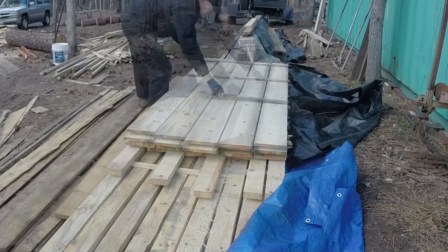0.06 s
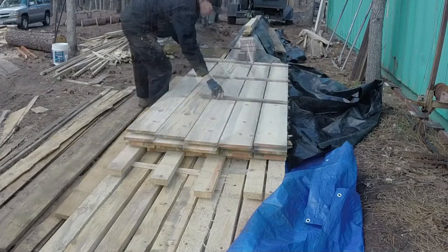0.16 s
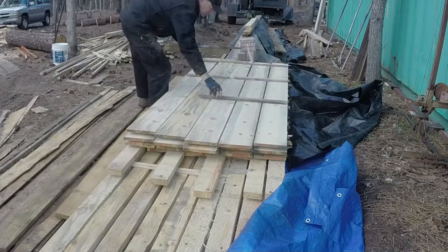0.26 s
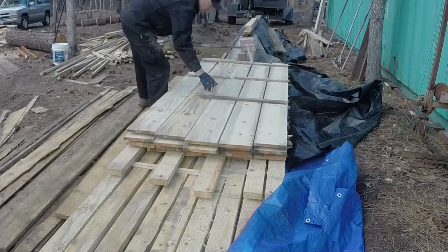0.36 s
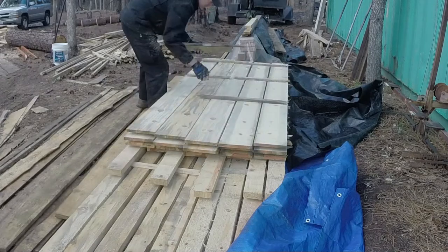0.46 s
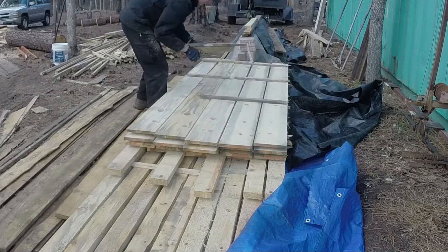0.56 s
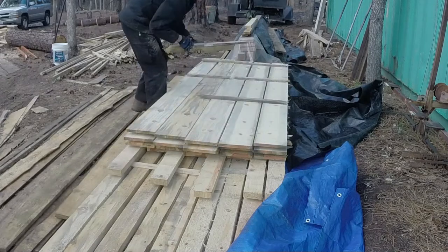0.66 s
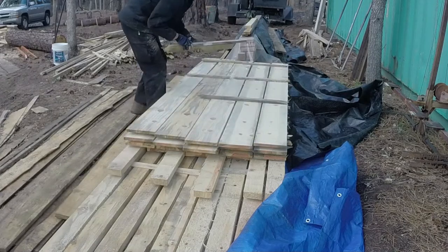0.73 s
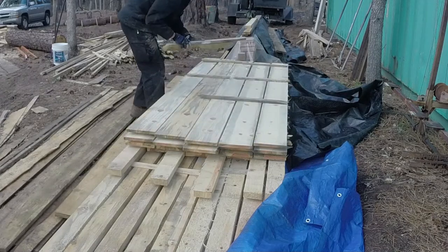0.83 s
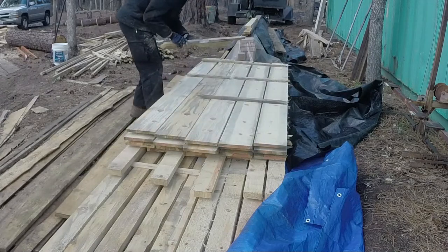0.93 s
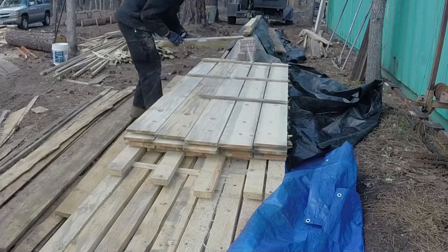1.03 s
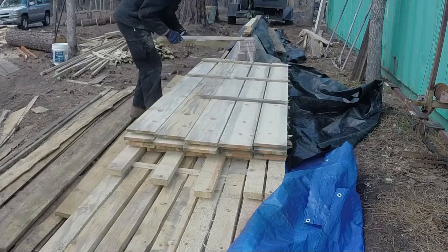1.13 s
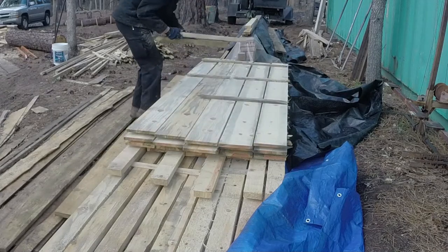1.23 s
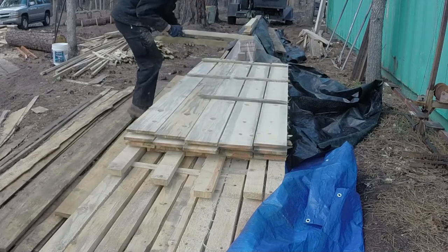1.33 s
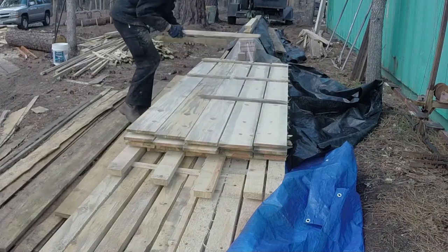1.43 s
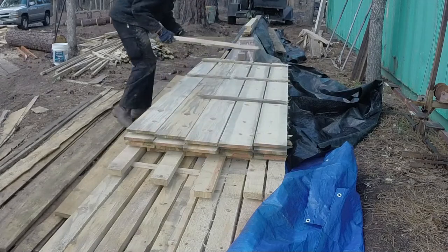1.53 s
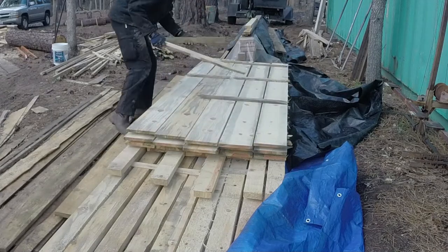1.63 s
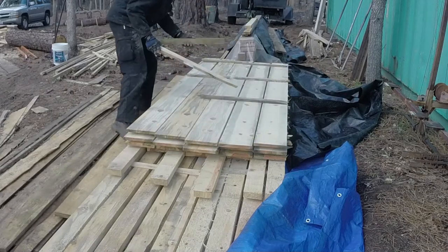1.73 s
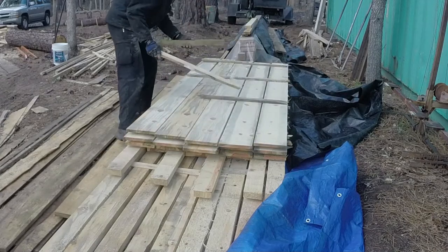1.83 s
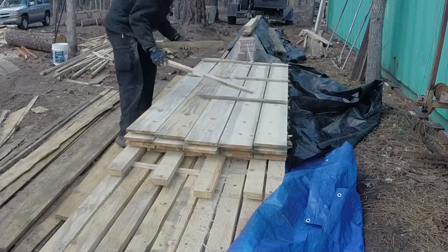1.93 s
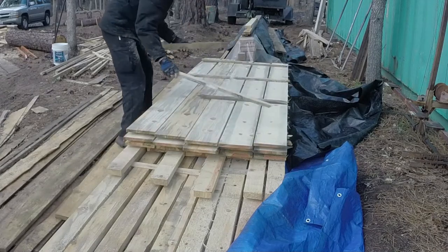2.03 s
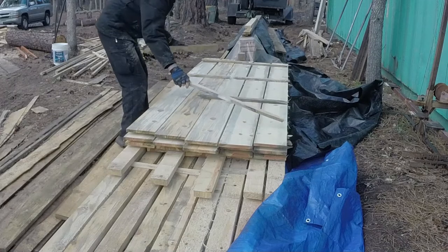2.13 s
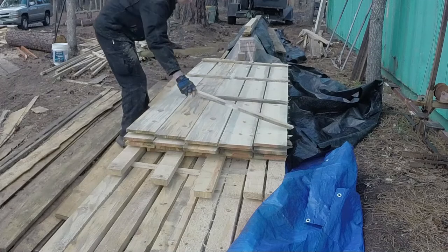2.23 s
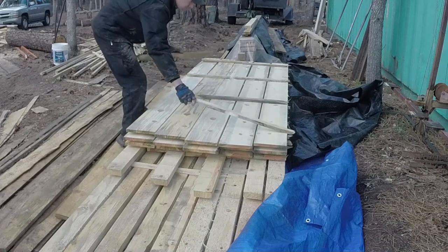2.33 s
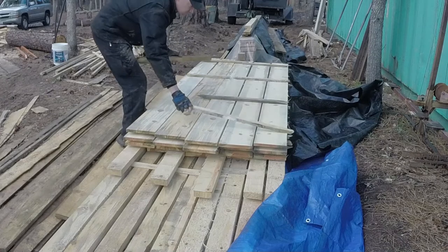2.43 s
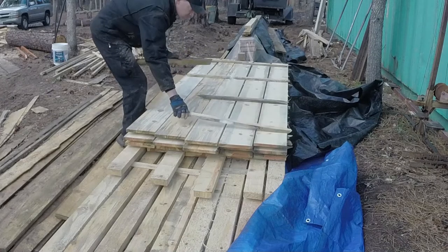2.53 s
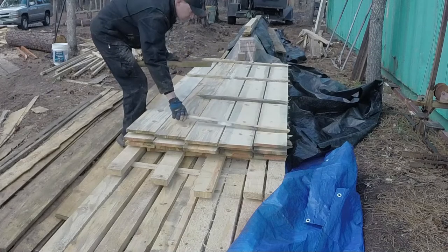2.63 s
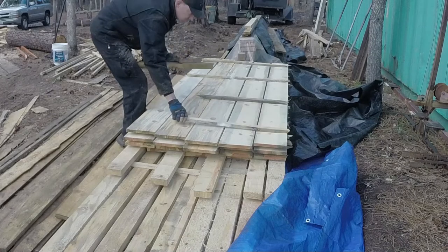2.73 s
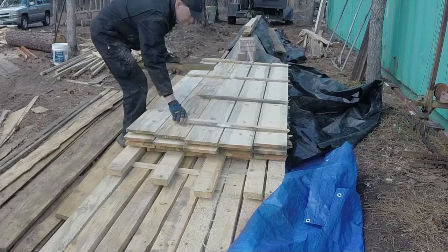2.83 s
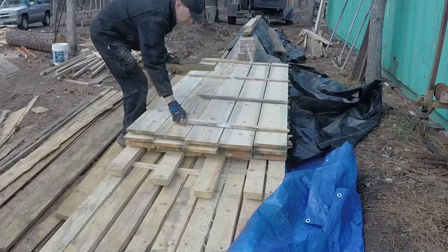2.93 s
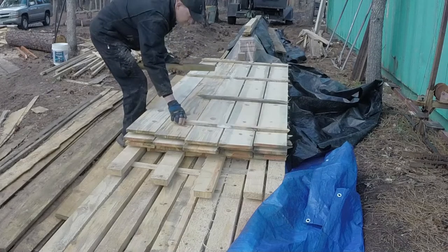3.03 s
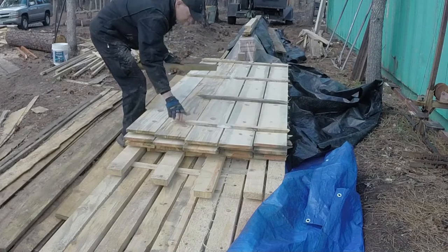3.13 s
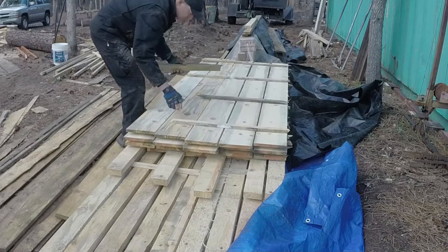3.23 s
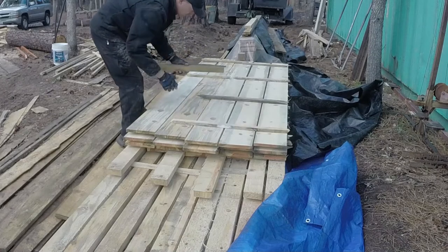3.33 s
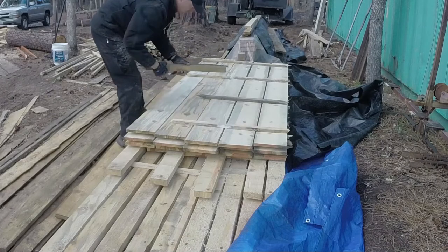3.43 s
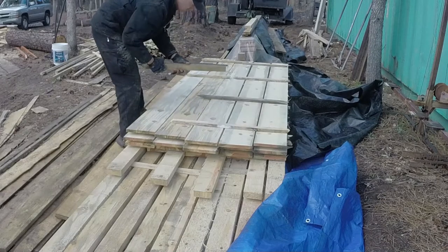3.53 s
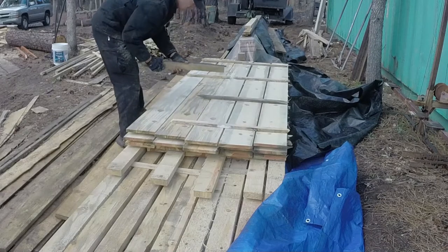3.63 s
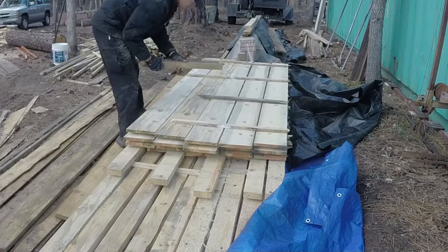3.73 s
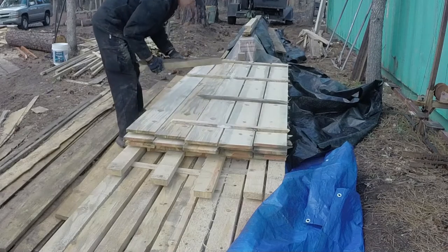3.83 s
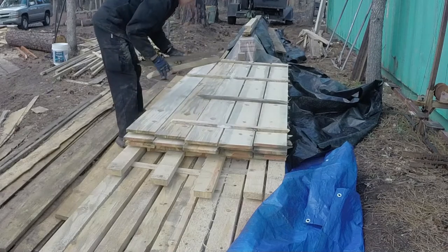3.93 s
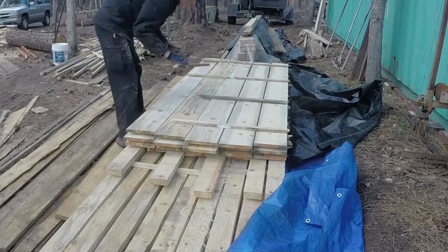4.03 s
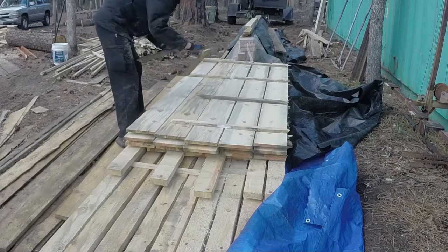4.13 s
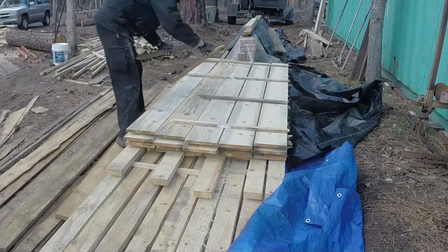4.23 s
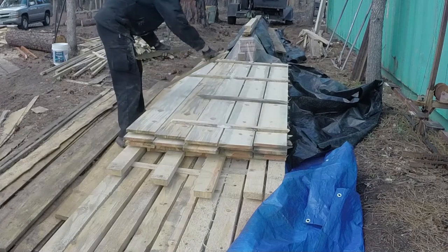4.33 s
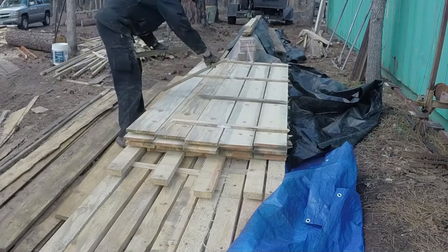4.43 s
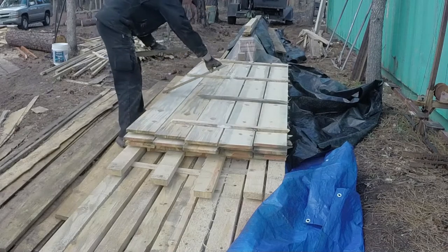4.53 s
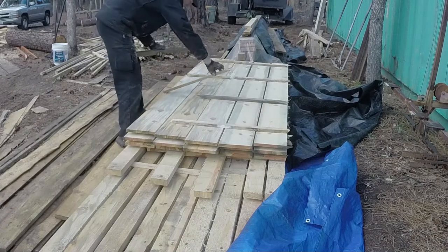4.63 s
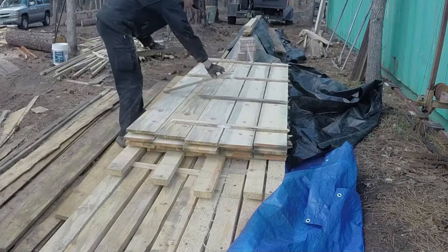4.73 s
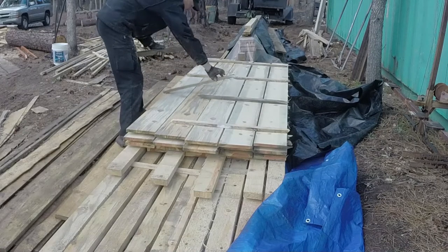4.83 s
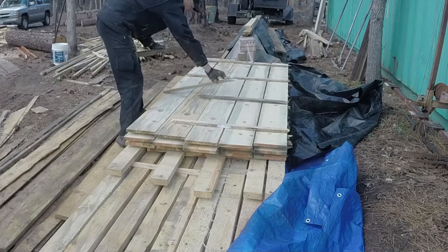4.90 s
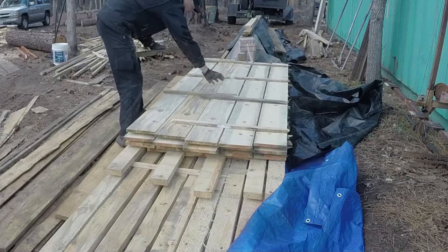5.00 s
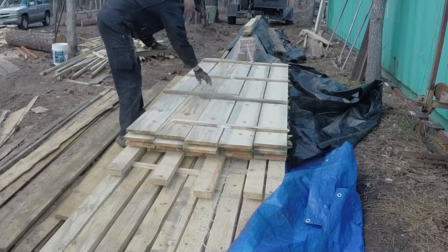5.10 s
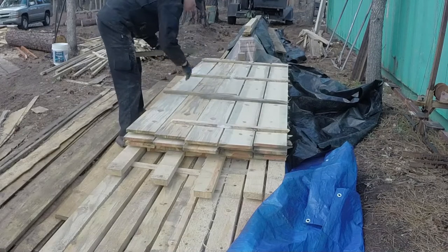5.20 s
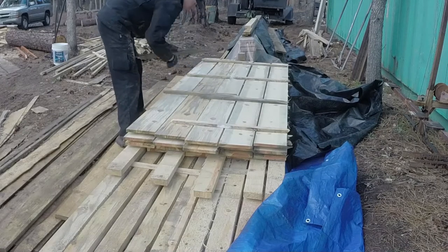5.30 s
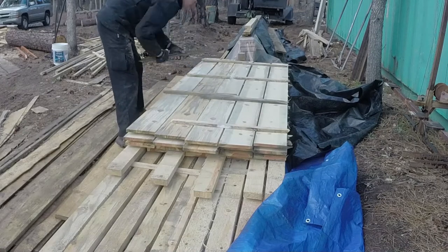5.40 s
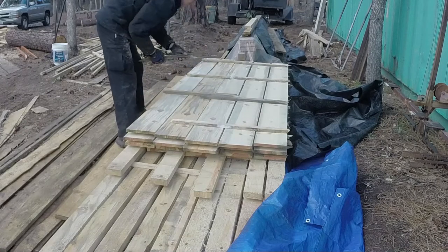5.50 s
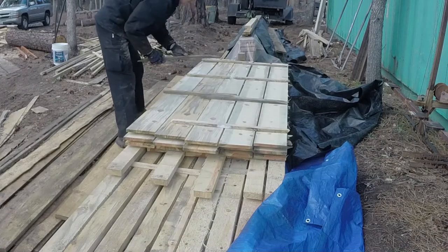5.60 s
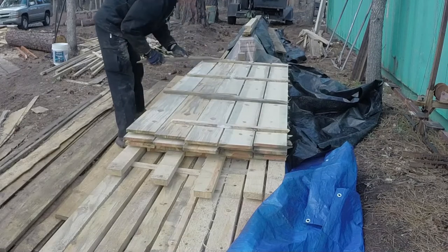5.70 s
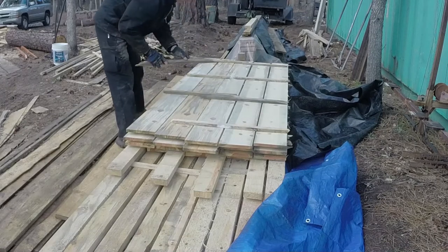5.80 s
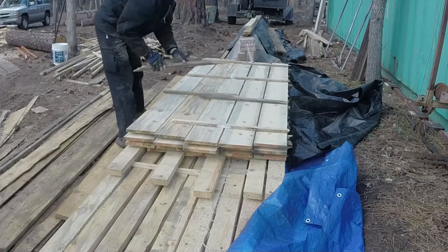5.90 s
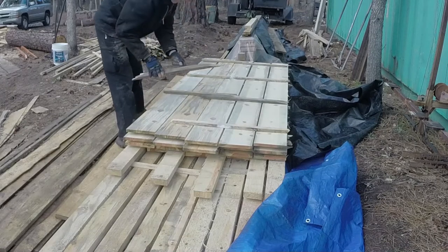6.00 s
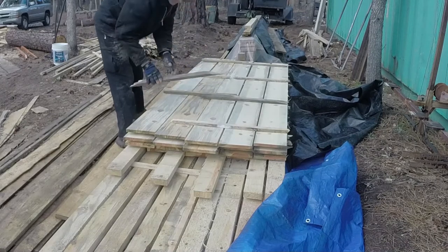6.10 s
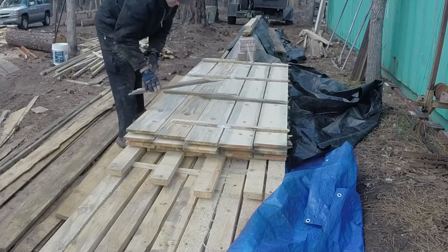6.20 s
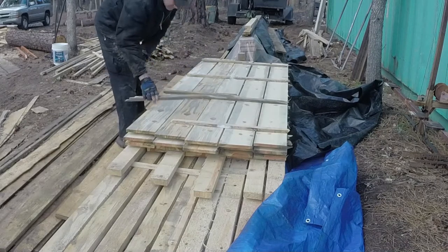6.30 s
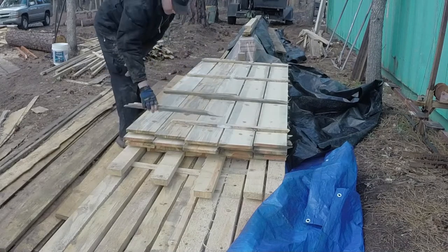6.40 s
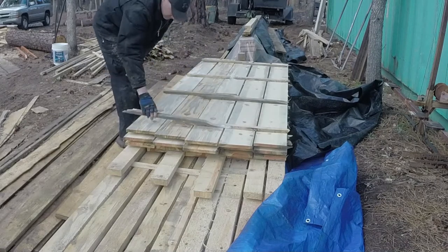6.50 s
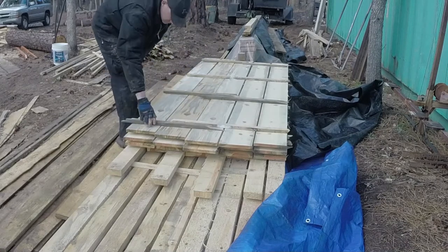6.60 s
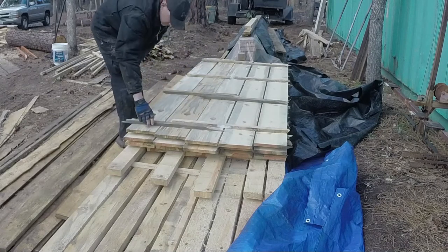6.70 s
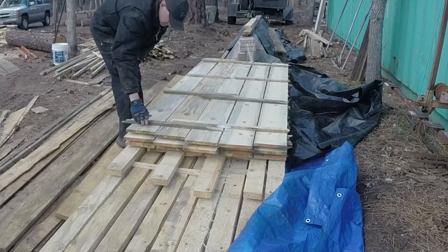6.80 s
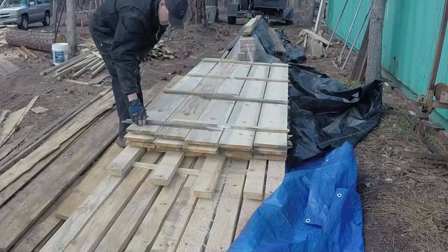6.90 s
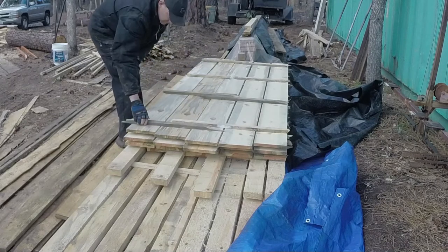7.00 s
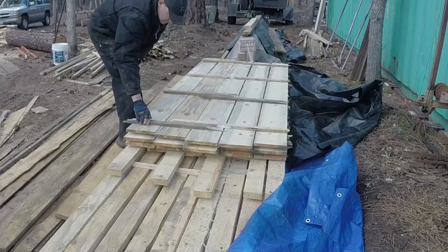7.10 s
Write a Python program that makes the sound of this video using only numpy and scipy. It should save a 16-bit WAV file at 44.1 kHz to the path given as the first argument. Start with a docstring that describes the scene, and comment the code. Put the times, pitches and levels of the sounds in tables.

```python
"""Thin wooden strips laid one by one across a stack of sawn boards, close to a stereo microphone
in an open yard. Each strip knocks, bounces and rings briefly in its bending modes; the last one
skids, its edges catching on the rough timber. Between the knocks a loose board rocks, boots thud
a little to the left, gloves rub and work clothes rustle. Small birds call far off on the right.
Under it all lie soft open air and a faint, narrow band of hiss that swells now and then."""
import sys
import numpy as np
from scipy import signal
from scipy.fft import rfft, irfft
from scipy.io import wavfile
from scipy.ndimage import uniform_filter1d

SR = 44100
rng = np.random.default_rng(int(sys.argv[2]) if len(sys.argv) > 2 else 0)


def pcm_store(signal):
    """Save signal as 16-bit PCM."""
    levels = np.round(np.clip(np.atleast_2d(signal), -1, 1) * 32767)
    wavfile.write(sys.argv[1], SR, levels.astype(np.int16).T)


N = 315315

# the open air and the narrow hiss, spectral density: frequency_hz, relative_db
AIR_COLOUR = [(12, -43.5), (20, -14.5), (60, 3.5), (81, -5.5), (187, -9), (277, -9.5), (328, -13.5),
              (367, -7), (607, -13), (1370, -30.5), (2020, -36.5), (2600, -40), (8890, -41.5),
              (11400, -43.5), (13500, -56.5), (16000, -69.5)]
HISS_COLOUR = [(1400, -24), (1850, -5.5), (2150, 2), (2420, -10.5), (2900, -13.5), (4000, -31.5)]
# how the open air leans between the microphones: frequency_hz, left_minus_right_db
AIR_BALANCE = [(110, 2), (300, -1), (2400, 0), (8000, 2)]
# how alike left and right are in background and near noise: frequency_hz, correlation
BACKGROUND_LIKENESS = [(60, 0.79), (300, 0.94), (640, 0.92), (1400, 0.94), (3100, 0.041), (8000, 0)]
NEAR_LIKENESS = [(60, 0.9), (1000, 1), (3000, 0.14), (10000, 0.26)]
# dulling of near sound at the left microphone: frequency_hz, gain_db
LEFT_SHADOW = [(300, -0.5), (1400, -1), (3500, -3), (9000, -5.5)]
# swells of the narrow hiss: peak_s, length_s, level_db
HISS_SWELLS = [(.21, 0.041, -72.5), (.57, 0.24, -70), (1.48, 0.62, -74.5), (2.7, 0.46, -75.5),
               (3.33, 0.46, -77), (4.45, 0.48, -91), (5.35, 0.48, -79.5), (6.2, 0.3, -74.5),
               (6.52, 0.24, -71), (6.85, 0.3, -81.5)]
# thin bird calls far off: start_s, length_s, top_pitch_hz, level_db
BIRD_CALLS = [(2.55, .06, 11500, -86), (2.73, 0.056, 11600, -89), (2.8, .07, 10300, -89),
              (6.485, .08, 9580, -83), (6.743, 0.12, 11300, -92), (6.939, 0.056, 10400, -90)]

# soles on soil, gloves on timber and moving cloth, spectral density: frequency_hz, relative_db
SCUFF_COLOUR = [(20, -24.5), (50, 1), (110, -3), (250, -5.5), (400, -17), (800, -21), (2000, -42.5)]
RUB_COLOUR = [(250, -12), (500, -4), (900, 0.5), (1500, -4), (2200, -6), (2900, -7.5), (4200, -10),
              (7000, -31.5)]
SWISH_COLOUR = [(2000, -12.5), (4200, -5), (6500, -2.5), (9000, -4.5), (11500, -10), (13000, -15.5),
                (16000, -20)]
# a boot shifts over soil and planks: peak_s, length_s, relative_db
BOOT_SCUFFS = [(.47, 0.12, -58), (.70, 0.46, -55.5), (1.52, 0.54, -61.5), (1.97, 0.058, -54.5),
               (2.19, 0.41, -54.5), (3.39, 0.3, -54.5), (4.20, 0.65, -58.5), (4.60, 0.12, -54),
               (5.36, 0.27, -53.5), (5.94, 0.21, -51), (6.15, 0.13, -53.5), (6.33, 0.25, -50),
               (6.58, 0.45, -56.5)]
# an arm or the body sweeps round: peak_s, length_s, rub_relative_db, swish_relative_db
BODY_SWEEPS = [(0.218, 0.024, -75, -75), (0.40, 0.27, -69, -78.5), (0.578, 0.22, -59, -68.5),
               (0.639, 0.076, -62.5, -66), (0.772, 0.2, -66, -74), (0.982, 0.087, -67, -74),
               (1.12, 0.09, -75, -76.5), (1.39, 0.65, -63.5, -69), (1.555, 0.051, -63, -63.5),
               (2.095, 0.37, -63.5, -74), (2.374, 0.14, -62.5, -75.5), (2.577, 0.37, -70, -76.5),
               (3.343, 0.25, -62, -70.5), (3.57, 0.34, -66, -76), (3.853, 0.09, -73, -67),
               (3.92, 0.16, -66, -82), (4.417, 0.86, -65.5, -76.5), (4.77, 0.37, -68.5, -72),
               (5.28, 0.9, -65.5, -71.5), (5.969, 0.18, -63, -72), (6.155, 0.12, -65.5, -71),
               (6.317, 0.22, -65.5, -78), (6.585, 0.56, -63.5, -72.5), (6.827, 0.14, -69, -76.5),
               (7.0, 0.25, -78, -85.5)]
# the worker is never quite still: scuff_relative_db, rub_relative_db, swish_relative_db
IDLE_LEVELS = (-74.5, -79.5, -91.5)
# boots land on soil and loose planks: start_s, level_db, pitch_hz, cycles_to_silence
BOOT_THUDS = [(0.559, -33, 150, 1.1), (0.652, -35.5, 132, 3.2), (0.71, -32.5, 72, 3.7),
              (0.894, -37.5, 328, 13), (1.437, -41, 67, 6.5), (2.149, -27, 85.4, 2.9),
              (2.156, -37, 228, 5.6), (2.169, -39, 188, 6.6), (3.327, -42, 106, 7),
              (3.593, -38.5, 130, 3.5), (4.249, -34, 129, 2.5), (4.436, -27, 139, 0.82),
              (5.484, -31, 132, 3.6), (6.23, -41.5, 108.4, 6.6), (6.307, -32, 94.5, 4.5),
              (6.422, -38, 138, 4.4), (6.801, -44.5, 123.6, 3.8)]

# wood sliding, dragging, snapping and cracking, spectral density: frequency_hz, relative_db
SLIDE_COLOUR = [(5000, -24), (6500, -4.5), (8000, -10), (10000, 0), (11200, 0.5), (12800, -6.5),
                (15500, -16.5)]
DRAG_COLOUR = [(130, -5), (260, 2.5), (450, -2.5), (700, -8.5), (1000, -8.5), (1500, -22.5), (3000, -31.5),
               (6000, -45)]
SNAP_COLOUR = [(800, -11), (2500, 5), (4000, -2.5), (5200, 1.5), (7500, -3.5), (10500, -8), (13000, -5),
               (16000, -16)]
CRACK_COLOUR = [(600, -15.5), (1300, -4.5), (1750, -1.5), (2200, 6), (3200, 6), (4300, 0.5), (6000, -23.5),
                (12000, -28.5)]
# a strip slides through the gloves: start_s, length_s, level_db
GLOVE_SLIDES = [(1.153, 0.48, -67), (1.45, 0.43, -75), (4.578, 0.3, -72.5), (4.99, 0.35, -68.5)]
# wood catches on wood and squeaks: start_s, pitch_hz, level_db
WOOD_SQUEAKS = [(3.083, 5750, -52), (3.347, 8400, -54.5), (3.547, 5600, -54.5), (3.797, 6500, -61),
                (3.812, 8200, -58), (4.996, 5920, -53)]
# a strip is pushed into place: peak_s, length_s, level_db
STRIP_DRAGS = [(1.955, .022, -59), (2.40, .11, -51)]
# splinters and twigs snap, rough edges catch: start_s, level_db, t60_s, pan_db, low_hz, high_hz
SPLINTER_SNAPS = [(0.725, -62, .012, -3, 7000, 13000), (0.932, -58, 0.012, 0, 5000, 13000),
                  (0.939, -64, .012, -5, 5000, 10000), (2.0384, -57, 0.012, 2, 4500, 9000),
                  (2.102, -52.5, 0.009, -6, 7040, 13000), (2.102, -44, 0.009, -9, 2400, 3800),
                  (2.1812, -52, 0.014, 7, 3000, 5500), (2.1874, -51, 0.009, 6, 3000, 7000),
                  (2.401, -60, 0.014, -4, 6000, 11000), (3.085, -55, 0.06, -1, 2010, 14500),
                  (3.3516, -47, 0.0091, 2, 6000, 11900), (3.544, -61, 0.084, -10, 4000, 14500),
                  (3.588, -54, 0.02, 10, 2020, 14500), (3.813, -58.5, .025, -4, 6500, 14500),
                  (3.892, -57.5, .025, -2, 3500, 14500), (4.299, -65, .008, -1, 5000, 8000),
                  (4.45, -64, .008, -2, 7000, 11000), (4.481, -56, .009, 0, 6000, 14000),
                  (4.818, -52, .008, 5, 4000, 12000), (4.88, -61, .008, 0, 4000, 12000),
                  (4.919, -53.5, 0.0094, 9, 4000, 12000), (5.079, -40, 0.013, -5, 1510, 14500),
                  (5.418, -52, 0.011, 3, 3500, 9000), (5.470, -56.5, 0.027, 3, 2000, 14500),
                  (5.489, -59, .008, 2, 7000, 14000), (5.603, -58, .04, -2.5, 2000, 14500),
                  (6.611, -52.5, 0.081, -2, 1490, 14400), (6.6652, -41, 0.054, -3.5, 3500, 14500),
                  (6.672, -34, 0.033, -2, 4300, 14000), (6.6762, -35, 0.028, -8, 4300, 14000),
                  (6.6878, -37, .035, 7, 4000, 14000), (6.6919, -32.5, 0.023, -1, 4000, 14000),
                  (6.703, -50, 0.063, -7, 5000, 14000), (6.746, -54, 0.028, -3, 4000, 11000)]
# a strip lands flat on the boards: start_s, level_db, centre_hz, t60_s, pan_db
STRIP_SLAPS = [(.247, -35.5, 1054, .045, 0), (2.0164, -26, 3500, 0.0095, -10),
               (2.0170, -25, 1400, .018, -3), (5.077, -29, 2300, .06, -3), (2.030, -41, 1250, .07, 2),
               (2.045, -35, 840, 0.072, 5), (4.554, -43.5, 690, .05, 1), (4.556, -54.5, 1510, 0.04, -1),
               (5.0758, -27, 2770, 0.045, -5), (5.081, -16, 1620, .046, -2.5), (5.090, -19, 633, .08, -0.5),
               (5.128, -39.5, 1200, .065, -1.5), (6.6641, -19, 1150, .016, -1), (6.666, -32, 1260, .06, -2),
               (6.673, -39, 2000, .07, -6), (6.686, -35, 2470, .05, 0), (6.698, -35.5, 1370, .06, -2)]

# how long the shaken stack rattles: frequency_hz, t60_s
STACK_RATTLE = [(100, 0.35), (300, 0.17), (700, 0.11), (1500, 0.1), (3000, 0.11), (8000, 0.063)]
# modes of the stack's low boom: pitch_hz, relative_db, t60_s
STACK_MODES = [(103.7, -26.5, 0.066), (153, -13, 0.05), (238, -10.5, 0.047)]
# bending modes of the four strips and of a loose top board: pitch_hz, relative_db, t60_s
STRIP_A_MODES = [(91, -9, 0.16), (144, -8.5, 0.14), (183, -17, 0.11), (282, 0.5, 0.062), (319.4, -20, 0.29),
                 (378, -17, 0.15), (456, 2.5, 0.044), (496, -10.5, 0.11), (536, -22, 0.19),
                 (591, -9.5, 0.051), (574, -11, 0.13), (660, 0.3, 0.037), (850, -22, 0.16),
                 (1108, -29, 0.11), (1323, -29, 0.045), (1510, -33, 0.045)]
STRIP_B_MODES = [(102, -28, 0.108), (192, -28, 0.2), (247, -11, 0.11), (291.5, -11.5, 0.148),
                 (286.3, 0.5, 0.11), (347, 2, 0.065), (415, -0.2, 0.069), (455, -1.5, 0.052),
                 (536, -19, 0.12), (654, -5.5, 0.077), (740, -24, 0.15), (840, -11, 0.052),
                 (933, -13, 0.046), (1176, -29, 0.2), (1270, -21, 0.071), (1460, -27, 0.056),
                 (2000, -22.5, 0.048)]
STRIP_C_MODES = [(102, -12, 0.2), (195, -15, 0.09), (240, -7, 0.15), (268, -12, 0.08), (298, -0.5, 0.09),
                 (360, -12, 0.17), (413, -14, 0.13), (460, -5.5, 0.12), (493, -2, 0.039), (588, -3, 0.09),
                 (628, -9, 0.09), (718, -4, 0.09), (883, -25, 0.15), (1010, -9, 0.045), (1130, -13, 0.055),
                 (1350, -5, 0.042), (1490, -6.5, 0.04), (1590, -15, 0.04), (1720, -14, 0.032),
                 (2030, -19, 0.036), (2300, -20, 0.032), (2680, -22, 0.028), (3150, -27, 0.025)]
STRIP_D_MODES = [(100, -14, 0.165), (131, -8.5, 0.13), (240, -26.5, 0.09), (299, -15.5, 0.13),
                 (384, -1, 0.09), (374, -3.5, 0.087), (541.6, -5, 0.11), (658, 0, 0.09), (727, -2.5, 0.074),
                 (786, -7, 0.07), (847, -5, 0.073), (1037, 1.5, 0.037), (1124, -13, 0.098),
                 (1308, -1.5, 0.04), (1400, -8, 0.09), (1640, -12, 0.061), (1754, -18, 0.07),
                 (2050, -24, 0.07)]
BOARD_MODES = [(134, 3, 0.082), (145, -16, 0.062), (201, -17, 0.18), (275, -15, 0.092), (311, -8, 0.099),
               (421, -7.5, 0.12), (593, -8, 0.076), (665, -10.5, 0.12), (730, -15.5, 0.15),
               (840, -7, 0.058), (1060, -16.5, 0.147)]
# the pieces of wood in the order they are handled
PIECES = [STRIP_A_MODES, STRIP_B_MODES, BOARD_MODES, STRIP_C_MODES, STRIP_D_MODES]
# when the hand takes each piece: start_s
PIECE_START_S = [0, 1, 3, 4, 5.8]
# where each piece lands: left_minus_right_db
PIECE_PAN_DB = [0.5, 1, -0.5, -1, -2]
# wood strikes wood: start_s, ring_db, thump_db, hardness_hz, bass_cut_hz
WOOD_KNOCKS = [(0.2442, -6.5, -24, 1600, 80.4), (0.25, -18.5, -40, 1290, 85),
               (0.265, -8.5, -38.3, 990, 730), (0.785, -45, -41.5, 1810, 300), (1.945, -48, -51, 1900, 500),
               (2.0171, -3.5, -12, 2500, 99), (2.021, -29, -10.5, 717, 102),
               (2.0308, -20, -18.5, 1783, 832), (2.045, -10.5, -13.5, 1201, 512),
               (2.081, -30, -21.5, 253, 115), (2.402, -39, -45, 1500, 450), (3.0814, -24, -40, 646, 178),
               (3.0847, -23, -31, 889, 98), (3.121, -27, -34.5, 900, 170), (4.553, -21.5, -28.5, 557, 85),
               (5.076, -5.5, -2, 4550, 108), (5.0814, 5.5, 9.5, 1950, 1640), (5.0898, 4.5, -3.5, 870, 810),
               (5.1274, -25, -26, 1865, 120), (6.6642, -9, -14, 2100, 337), (6.6754, -3.5, -38.5, 930, 580),
               (6.685, -16, -20, 2020, 111), (6.6987, -19.5, -31, 1500, 150), (6.742, -23.5, -24, 930, 160),
               (7.096, -58.5, -47, 1776, 700)]


def amp(db):
    """Decibels to amplitude."""
    return 10 ** (np.asarray(db) / 20)


def unit_rms(x):
    """Scales to rms 1."""
    return x / np.sqrt(np.mean(x ** 2) + 1e-20)


def decay(t, t60_s):
    """An envelope that falls 60 dB in t60_s."""
    return np.exp(-np.log(1000) * t / t60_s)


def curve_at(points, hz):
    """Reads a table on a log-frequency axis."""
    points_hz, values = np.transpose(points)
    return np.interp(np.log(hz + 1), np.log(points_hz + 1), values)


def coloured(x, colour):
    """Shapes the spectrum of a sound by a colour table."""
    hz = np.fft.rfftfreq(x.shape[-1], 1 / SR)
    return irfft(rfft(x) * amp(curve_at(colour, hz)), x.shape[-1])


def panned(x, pan_db):
    """Shares a sound between the microphones; positive is left."""
    return x * amp([[pan_db / 2], [-pan_db / 2]])


def add(mix, start_s, sound):
    """Mixes a sound in at start_s."""
    part = mix[:, round(start_s * SR):][:, :sound.shape[-1]]
    part += sound[..., :part.shape[1]]


def filtered(x, hz, kind, order):
    """Causal low-pass or high-pass."""
    return signal.sosfilt(signal.butter(order, hz, kind, fs=SR, output="sos"), x)


def noise(colour, likeness, patchy_db, balance=((1, 0), (2, 0))):
    """Stereo noise of rms 1 with a given colour and drifting patches."""
    frames, hz = N // 256 + 5, np.fft.rfftfreq(1024, 1 / SR)
    real, imag, own_real, own_imag, patches = rng.standard_normal((5, frames, len(hz)))
    patches = uniform_filter1d(patches, size=8, axis=0)
    patches = unit_rms(uniform_filter1d(patches, size=16, axis=1))
    shared = np.clip(curve_at(likeness, hz), -1, 1)
    right = real + 1j * imag
    left = shared * right + np.sqrt(1 - shared ** 2) * (own_real + 1j * own_imag)
    left *= amp(curve_at(balance, hz))
    spectra = np.array([left, right]) * amp(curve_at(colour, hz) + patchy_db * patches)
    return unit_rms(signal.istft(spectra.swapaxes(1, 2), nperseg=1024, noverlap=768)[1][:, :N])


def swells(events, rise_share, rise_shape, idle_db, fall_shape=2.9):
    """Each event gathers and eases off above a resting level; a higher shape is squarer."""
    t = np.arange(0, N, 64) / SR
    power = amp(idle_db) ** 2
    for peak_s, length_s, level_db in events:
        from_peak = np.maximum((peak_s - t) / rise_share, (t - peak_s) / (1 - rise_share)) / length_s
        shape = np.where(t < peak_s, rise_shape, fall_shape)
        power = power + (amp(level_db) * np.exp(-from_peak ** shape)) ** 2
    return np.interp(np.arange(N) / SR, t, np.sqrt(power))


def reflections(x, t60_by_hz, delay_s):
    """Dense random reflections, each band dying at its own speed; the sides part in the treble."""
    mid, side = rng.standard_normal((2, SR // 2))
    side = .5 * filtered(side, 4400, "high", order=1)
    hz, t, spectra = signal.stft(np.array([mid + side, mid - side]), SR, nperseg=256)
    spectra = spectra * decay(t, curve_at(t60_by_hz, hz)[:, None])
    tail = signal.istft(spectra, SR, nperseg=256)[1]
    tail = np.pad(tail, ((0, 0), (round(delay_s * SR), 0)))
    return signal.fftconvolve(x, tail / np.linalg.norm(tail[0]), axes=1)[:, :N]


def open_air(level_db=-60.5):
    """Soft, low noise from all round the yard."""
    return amp(level_db) * noise(AIR_COLOUR, BACKGROUND_LIKENESS, patchy_db=2, balance=AIR_BALANCE)


def narrow_hiss():
    """A faint, narrow band of hiss near 2.1 kHz that swells now and then."""
    strength = swells(HISS_SWELLS, rise_share=.55, rise_shape=3.8, idle_db=-90.5)
    return strength * noise(HISS_COLOUR, BACKGROUND_LIKENESS, patchy_db=1)


def distant_birds(arch_depth=.05, blur_db=-2):
    """Far to the right, whistles rise and fall a little, blurred by the trees."""
    out = np.zeros((2, N))
    for start_s, length_s, top_hz, level_db in BIRD_CALLS:
        bend = np.linspace(-1, 1, round(length_s * SR)) ** 2
        pitch_hz = top_hz * (1 - arch_depth * bend)
        whistle = np.sin(2 * np.pi * np.cumsum(pitch_hz) / SR)
        add(out, start_s, amp(level_db) * panned(whistle * (1 - bend), pan_db=-23))
    return out + amp(blur_db) * reflections(out, [(5000, .083), (15000, .12)], delay_s=.006)


def yard_echo(impacts, level_db=-32, t60_s=.49, bass_cut_hz=750):
    """The fence and trees return a faint, thin echo."""
    thin = filtered(impacts, bass_cut_hz, "high", order=2)
    return amp(level_db) * reflections(thin, [(2000, t60_s), (10000, t60_s / 2)], delay_s=.036)


def worker_rustle(scuff_db=-2, rub_db=-2, swish_db=1, crinkle_db=1.05, flips_per_s=25, flip_gain=2.2):
    """Close by, soles scuff, gloves rub on timber and cloth swishes with a fine crinkle."""
    scuff_idle_db, rub_idle_db, swish_idle_db = IDLE_LEVELS
    sweeps = np.array(BODY_SWEEPS)
    scuff = swells(BOOT_SCUFFS, rise_share=.43, rise_shape=5.2, idle_db=scuff_idle_db)
    rub = swells(sweeps[:, [0, 1, 2]], rise_share=.5, rise_shape=1.4, idle_db=rub_idle_db)
    swish = swells(sweeps[:, [0, 1, 3]], rise_share=.5, rise_shape=1.4, idle_db=swish_idle_db)
    flutter = unit_rms(uniform_filter1d(rng.standard_normal(N), size=90))
    crinkle = unit_rms(amp(crinkle_db * flutter))
    # folds of cloth flip over at random, each with a tiny 1 ms tick
    flips = (rng.random(N) < flips_per_s / SR) * rng.uniform(0, 1.6, N)
    flips = signal.lfilter([1], [1, -np.exp(-1 / (.001 * SR))], flips)
    swish *= 1 + flip_gain * flips
    soles = amp(scuff_db) * scuff * noise(SCUFF_COLOUR, NEAR_LIKENESS, patchy_db=3)
    gloves = amp(rub_db) * rub * crinkle * noise(RUB_COLOUR, NEAR_LIKENESS, patchy_db=3)
    cloth = amp(swish_db) * swish * crinkle * noise(SWISH_COLOUR, NEAR_LIKENESS, patchy_db=1.6)
    return panned(soles, pan_db=5) + gloves + cloth


def boot_thuds(softness_hz=600):
    """Left of centre, each boot gives a low push that dies within a few cycles."""
    out, t = np.zeros((2, N)), np.arange(SR // 4) / SR
    for start_s, level_db, pitch_hz, cycles in BOOT_THUDS:
        push = np.sin(2 * np.pi * pitch_hz * t) * decay(t, cycles / pitch_hz)
        add(out, start_s, amp(level_db) * filtered(push, softness_hz, "low", order=2))
    return panned(out, pan_db=5)


def strip_handling(squeak_s=.0091, squeak_jitter=.088):
    """Strips hiss through the gloves and, catching on wood, squeak at a wavering pitch."""
    sliding = np.zeros((1, N))
    for start_s, length_s, level_db in GLOVE_SLIDES:
        add(sliding, start_s, amp(level_db) * np.hanning(round(length_s * SR)))
    out = sliding * noise(SLIDE_COLOUR, NEAR_LIKENESS, patchy_db=-1.5)
    envelope = np.hanning(round(squeak_s * SR))
    for start_s, pitch_hz, level_db in WOOD_SQUEAKS:
        waver = unit_rms(uniform_filter1d(rng.standard_normal(SR // 10), size=20))[:len(envelope)]
        squeak = np.sin(2 * np.pi * np.cumsum(pitch_hz * (1 + squeak_jitter * waver)) / SR)
        add(out, start_s, amp(level_db) * envelope * squeak)
    return out


def strip_drags():
    """A strip pushed over the boards gives a soft, dull scrape."""
    strength = swells(STRIP_DRAGS, rise_share=.54, rise_shape=3.1, idle_db=-110)
    return strength * noise(DRAG_COLOUR, NEAR_LIKENESS, patchy_db=4.5)


def splinter_snaps(grain_db=4, grain_share=.29, stereo_width=.15):
    """Each snap is a quick, dying cluster of tiny fibre breaks."""
    out, t = np.zeros((2, N)), np.arange(SR // 5) / SR
    for start_s, level_db, t60_s, pan_db, low_hz, high_hz in SPLINTER_SNAPS:
        breaks = rng.standard_normal((2, len(t))) * (rng.random((2, len(t))) < grain_share)
        breaks *= amp(grain_db * np.minimum(rng.exponential(1, breaks.shape), 3))
        breaks = filtered(coloured(breaks, SNAP_COLOUR), high_hz, "low", order=3)
        mid, side = unit_rms(filtered(breaks, low_hz, "high", order=3))
        snap = np.array([mid + stereo_width * side, mid - stereo_width * side]) * decay(t, t60_s)
        add(out, start_s, amp(level_db) * panned(snap, pan_db))
    return out


def strip_slaps(width_octaves=.21):
    """Landing flat, a strip touches at many points at once: a dense burst around one pitch."""
    out, t = np.zeros((2, N)), np.arange(SR // 4) / SR
    octaves = np.log2(np.fft.rfftfreq(len(t), 1 / SR) + 1)
    for start_s, level_db, centre_hz, t60_s, pan_db in STRIP_SLAPS:
        band = np.exp(-.5 * ((octaves - np.log2(centre_hz)) / width_octaves) ** 2)
        burst = unit_rms(irfft(rfft(rng.standard_normal(len(t))) * band, len(t)))
        attack = 1 - np.exp(-(t * centre_hz) ** 2)
        add(out, start_s, amp(level_db) * panned(burst * attack * decay(t, t60_s), pan_db))
    return out


def mode_swings(modes, t):
    """Each mode of struck wood swings as a dying sine."""
    return [amp(db) * decay(t, t60_s) * np.sin(2 * np.pi * hz * t) for hz, db, t60_s in modes]


def stack_thump(t, end_hz=300, t60_s=.017, glide_depth=2.53, glide_s=.00076):
    """Bending waves carry treble faster than bass: a quick downward sweep over the stack's boom."""
    cycles = end_hz * (t + glide_depth * glide_s * (1 - np.exp(-t / glide_s)))
    return np.sin(2 * np.pi * cycles) * decay(t, t60_s) + sum(mode_swings(STACK_MODES, t))


def wood_ring(modes, t):
    """A piece rings at its far end, where neighbouring modes swing in opposite senses."""
    ring = sum((-1) ** k * swing for k, swing in enumerate(mode_swings(modes, t)))
    return ring / (2 * np.linalg.norm([amp(db) for _, db, _ in modes]))


def wood_knocks(crack_gain=.0561, crack_t60_s=.009):
    """Each blow thumps the stack and rings the piece; a soft contact leaves out the high modes."""
    out, t = np.zeros((2, N)), np.arange(SR // 2) / SR
    thump = stack_thump(t)
    rings = [wood_ring(modes, t) for modes in PIECES]
    for start_s, ring_db, thump_db, hardness_hz, bass_cut_hz in WOOD_KNOCKS:
        piece = np.searchsorted(PIECE_START_S, start_s) - 1
        # the crowded high modes blur into a dry crack
        crack = unit_rms(coloured(rng.standard_normal(len(t)), CRACK_COLOUR)) * decay(t, crack_t60_s)
        blow = amp(ring_db) * (rings[piece] + crack_gain * crack) + amp(thump_db) * thump
        blow = filtered(blow, hardness_hz, "low", order=4)
        blow = filtered(blow, bass_cut_hz, "high", order=2)
        add(out, start_s, panned(blow, PIECE_PAN_DB[piece]))
    return out


def scene(rattle_db=-12, left_lag_samples=5.25):
    """Beside the stack: blows shake the boards close by, with the open yard behind."""
    impacts = wood_knocks() + strip_slaps() + boot_thuds() + splinter_snaps()
    impacts += amp(rattle_db) * reflections(impacts, STACK_RATTLE, delay_s=.003)
    echo = yard_echo(impacts)
    near = impacts + worker_rustle() + strip_handling() + strip_drags()
    # sound from the stack reaches the left microphone later and duller
    hz = np.fft.rfftfreq(N, 1 / SR)
    lag = np.exp(-2j * np.pi * hz * left_lag_samples / SR)
    near[0] = irfft(rfft(near[0]) * amp(curve_at(LEFT_SHADOW, hz)) * lag, N)
    return near + echo + open_air() + narrow_hiss() + distant_birds()


def record(dry, ceiling=.75, top_hz=15900):
    """The microphone rounds off the hardest peaks; the highest treble is cut away."""
    rounded = ceiling * np.tanh(dry / ceiling)
    low_pass = signal.firwin(511, top_hz, window=("kaiser", 9), fs=SR)
    return signal.oaconvolve(rounded, low_pass[None], "same")


dry = scene()
out = record(dry)
pcm_store(out)
```